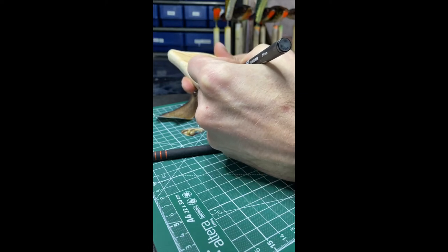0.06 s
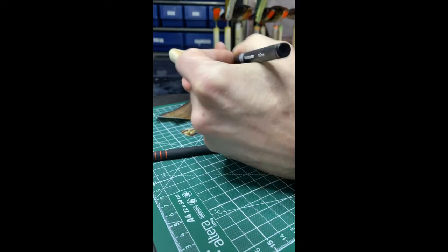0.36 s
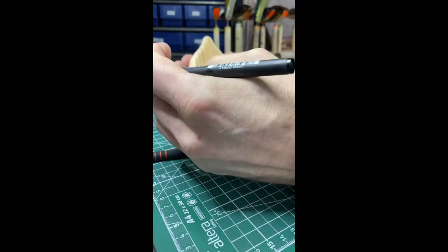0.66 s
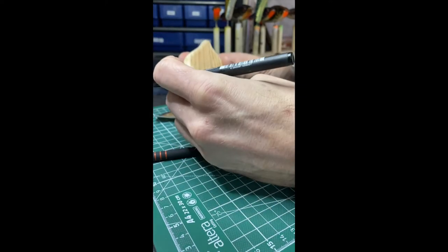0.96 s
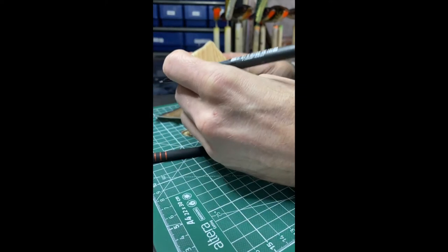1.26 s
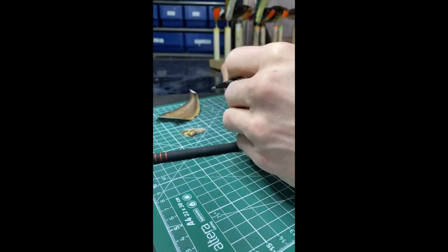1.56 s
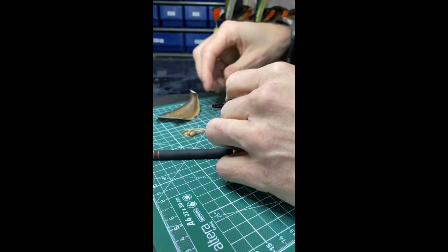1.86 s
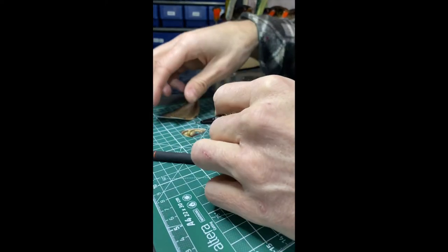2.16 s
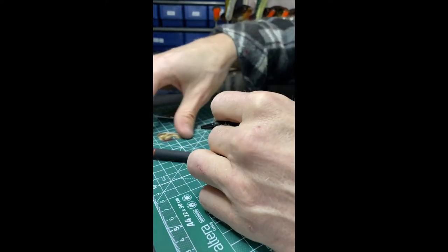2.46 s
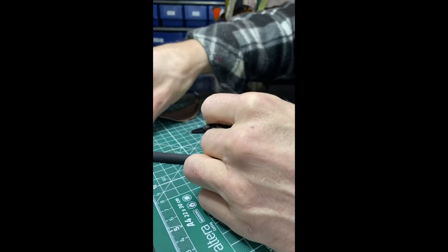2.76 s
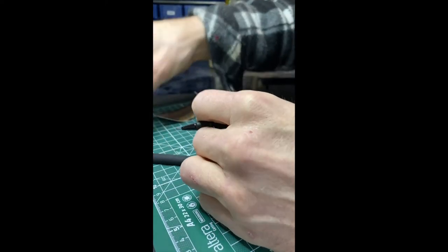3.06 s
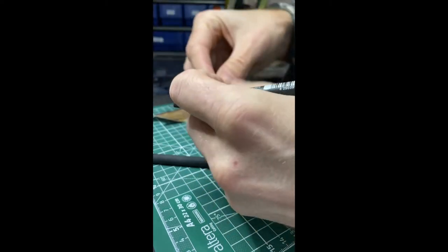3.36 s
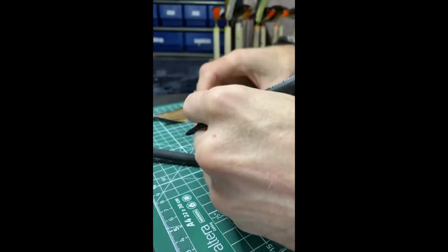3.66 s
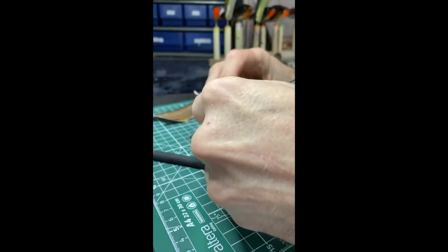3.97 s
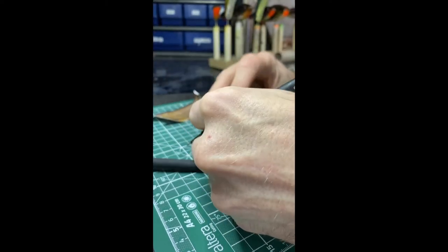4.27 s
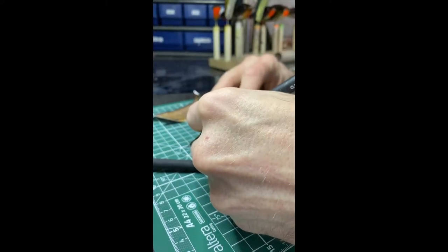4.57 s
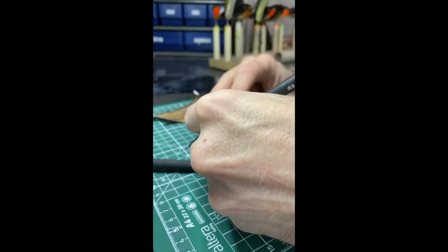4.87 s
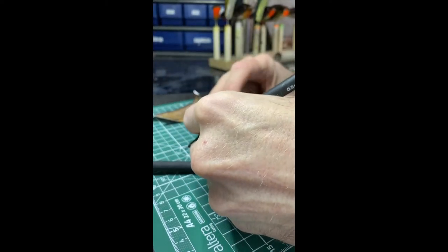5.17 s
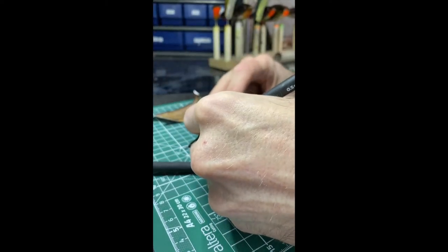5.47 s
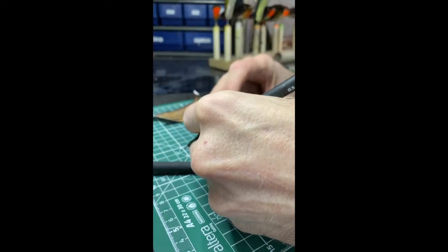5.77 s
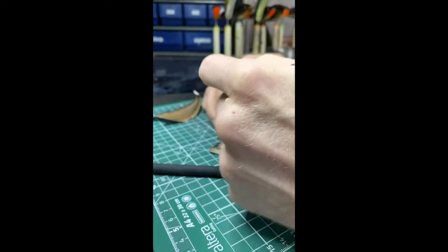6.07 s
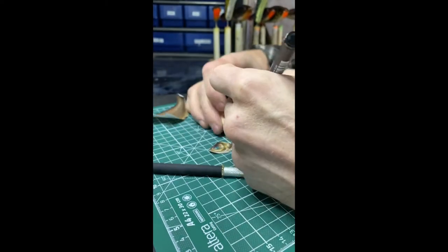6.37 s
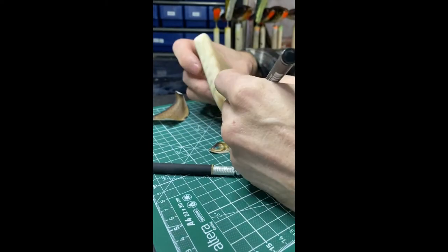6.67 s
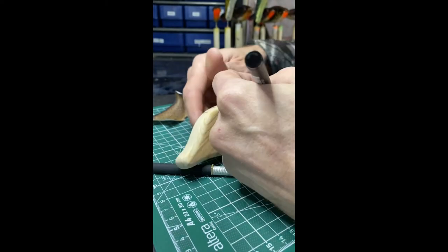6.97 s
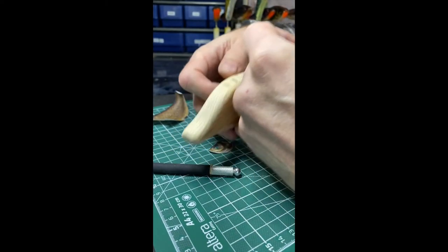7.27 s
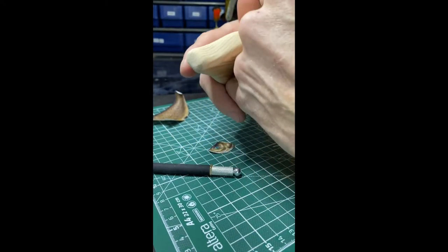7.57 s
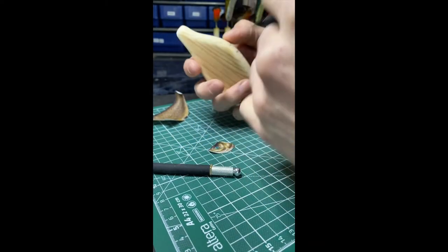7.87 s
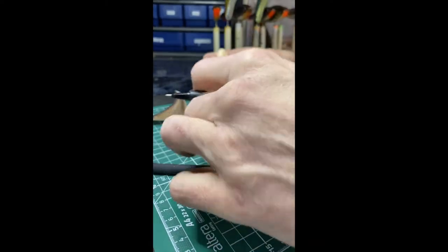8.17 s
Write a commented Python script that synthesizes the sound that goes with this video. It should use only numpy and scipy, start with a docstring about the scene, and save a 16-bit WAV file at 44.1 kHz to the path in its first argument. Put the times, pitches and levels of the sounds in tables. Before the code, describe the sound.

Close, scattered clicks, dull bench bumps and faint skin and sleeve rustles as a pen and wood are handled, a fan humming low.

```python
"""In a small workshop, a pen and a wooden blank are handled on a cutting mat, close to the microphone.
Each tap is an impact: a short pulse of force cracks, rings the modes of the wood and sends bending
waves through the bench, which booms; the room's reverberation soon dies. Between the taps, friction
of hands and a sleeve makes hisses, scuffs and tiny rasps over the low hum of a fan."""
import sys
import numpy as np
from scipy import signal
from scipy.fft import rfft, irfft
from scipy.io import wavfile
from scipy.ndimage import map_coordinates

SR = 44100
rng = np.random.default_rng(int(sys.argv[2]) if len(sys.argv) > 2 else 0)


def master(y):
    """Save y as 16-bit WAV."""
    cut = np.clip(np.atleast_2d(y).T, -1, 1)
    pcm = np.round(cut * 32767)  # scale
    wavfile.write(sys.argv[1], SR, pcm.astype(np.int16))


N = 371181
TIME = np.arange(N) / SR
HZ = np.fft.rfftfreq(N, 1 / SR)


def amp(db):
    """Amplitude ratio: a factor of ten for every 20 dB."""
    return 10 ** (np.asarray(db) / 20)


def unit_rms(x):
    """Normalisation to a mean power of 1."""
    return x / np.sqrt(np.mean(x ** 2) + 1e-20)


def curve(points, hz):
    """Interpolation of a table on a logarithmic frequency axis."""
    f, value = np.transpose(points)
    return np.interp(np.log(hz + 1), np.log(np.maximum(f, 0) + 1), value)


def add(mix, start, sound):
    """Superposition: a sound joins the mix at its start time."""
    part = mix[:, max(round(start * SR), 0):][:, :sound.shape[-1]]
    part += sound[..., :part.shape[1]]


def wander(rate_hz):
    """Random modulation of rms 1, linear between values drawn at the given rate."""
    knots = rng.standard_normal(N // 16)
    return unit_rms(np.interp(TIME * rate_hz, np.arange(len(knots)), knots))


def diffuse(size):
    """Diffuse field: spectra of white noise from all round, partly coherent at two microphone ports."""
    # likeness of the sound at the two ports: f/Hz, correlation coefficient
    coherence = [(60, 0.98), (280, 1), (420, 0.21), (520, 0.65), (700, 0.28), (900, 0.63), (1130, -0.41),
                 (1400, -0.037), (2000, 1), (3000, 0.26), (4500, -0.4), (5500, 0.94), (7500, 1),
                 (16000, 0.39)]
    left, independent = rfft(rng.standard_normal((2, size)))
    common = np.clip(curve(coherence, np.fft.rfftfreq(size, 1 / SR)), -1, 1)
    return np.array([left, common * left + np.sqrt(1 - common ** 2) * independent])


def noise(colour, ripple_db=1.8, ripple_hz=70, size=2 ** 19):
    """Spectral shaping: coloured diffuse noise with a slight, steady random ripple above 900 Hz."""
    hz = np.fft.rfftfreq(size, 1 / SR)
    knots = rng.standard_normal(size // 64)
    uneven_db = ripple_db * np.interp(hz / ripple_hz, np.arange(len(knots)), knots) * (hz > 900)
    x = irfft(diffuse(size) * amp(curve(colour, hz) + uneven_db))[:, :N]
    return x / x.mean(0).std()


def fan(low_db=-49.5, high_db=-66.5, tone_db=-3, waver=.006):
    """Flow noise: a steady broadband rush of air with a few faint tones that waver in frequency."""
    # spectra of the low rush and the upper hiss: f/Hz, level/dB
    rush_colour = [(12, -47), (20, -37), (54, -1.5), (107, -4.5), (150, -13.5), (183, -8.5), (235, -2.5),
                   (318, -5.5), (346, -8), (370, -6.5), (430, -5), (476, -15.5), (676, -9), (827, -6.5),
                   (1100, -27.5), (1430, -54), (2420, -120)]
    hiss_colour = [(650, -32.5), (1100, -3.5), (1630, -14), (1990, -12), (2670, -23), (2950, -20.5),
                   (4880, -29.5), (7060, -39), (16000, -51.5)]
    # tones of the hum: f/Hz, relative level/dB
    tones = [(236.9, -59.5), (376.8, -61.5), (597.5, -67.5), (678.3, -62.5)]
    air = amp(low_db) * noise(rush_colour) + amp(high_db) * noise(hiss_colour)
    hum = 0
    for hz, db in tones:
        pitch = hz * (1 + waver * wander(20))
        hum += amp(db) * np.sin(2 * np.pi * np.cumsum(pitch) / SR)
    return air + np.sqrt(2) * amp(tone_db) * hum


def room(x, delay_s=0.0035, early_db=6, early_s=0.034, size=256):
    """Reverberation: strong early reflections off bench and shelves, then exponential decay by band."""
    # reverberation time: f/Hz, T60/s
    decay_times = [(60, 0.45), (250, 0.45), (1000, 0.21), (2500, 0.29), (6000, 0.19), (15000, 0.22)]
    # spectrum of the reflections: f/Hz, level/dB
    colour = [(60, 3.5), (170, 5), (300, -5), (550, 5.5), (900, -0.5), (1300, 3), (2000, -9.5), (3200, -6),
              (4500, -9), (6200, -11), (16000, -12.5)]
    hz, t, bands = signal.stft(irfft(diffuse(SR // 2)), SR, nperseg=size)
    bands *= amp(-60 * t / curve(decay_times, hz)[:, None] + curve(colour, hz)[:, None])
    tail = signal.istft(bands, SR, nperseg=size)[1]
    tail[:, :int(delay_s * SR)] = 0
    tail *= amp(early_db * np.exp(-(TIME[:tail.shape[1]] / early_s) ** 2))
    return signal.fftconvolve(x, tail / np.linalg.norm(tail[0]), axes=1)[:, :N]


def sweep(length, attack_s=0.026, sag_db_per_s=2, release_db_per_s=203.5):
    """Amplitude envelope of a brushing hand: it gets going, eases off a little and comes to rest."""
    t = np.arange(0, length + .3, 1 / SR)
    rise = np.sin(np.pi / 2 * np.clip(t / attack_s, 0, 1)) ** 2
    return rise * amp(-sag_db_per_s * t - release_db_per_s * np.maximum(t - length, 0))


def drifting_colour(x, patch_db=2.5, patch_hz=600, patch_s=.06, size=512):
    """Time-varying filter: small random peaks and dips drift through the hiss, so it shimmers."""
    hz, t, bands = signal.stft(x, SR, nperseg=size)
    knots = rng.standard_normal((128, 1024))
    grid = np.meshgrid(hz / patch_hz, t / patch_s, indexing="ij")
    patches = unit_rms(map_coordinates(knots, grid, order=1, mode="wrap"))
    return signal.istft(bands * amp(patch_db * patches), SR, nperseg=size)[1][:, :N]


def brushing(gain_db=6, grain_db=1.05, grain_hz=400, pressure_db=2.9, pressure_hz=22):
    """Sliding friction: skin and sleeve hiss, modulated by wavering pressure and tiny catching grains."""
    # hand movements: start t/s, duration/s, relative level/dB
    movements = [(0.33, 0.83, -81.5), (0.42, 0.038, -70), (0.517, 0.022, -67.5), (0.682, 0.15, -72.5),
                 (1.22, 0.88, -77), (1.292, 0.063, -73.5), (1.592, 0.19, -71.5), (1.896, 0.028, -73),
                 (2.109, 0.16, -84), (2.334, 0.34, -62.5), (2.66, 0.078, -74), (2.78, 0.033, -67),
                 (2.86, 0.14, -79), (2.928, 0.1, -69), (3.075, 0.34, -76), (3.376, 0.055, -66.5),
                 (3.492, 0.063, -69.5), (3.569, 0.25, -76), (3.86, 0.033, -83), (3.932, 0.046, -79),
                 (5.825, 0.031, -58.5), (5.85, 2.2, -74.5), (5.88, 0.26, -70), (6.176, 0.21, -67),
                 (6.356, 0.35, -69.5), (6.806, 0.14, -66), (7.036, 0.15, -67), (7.21, 0.067, -61),
                 (7.382, 0.15, -63), (7.536, 0.17, -67), (7.775, 0.3, -71.5), (8.016, 0.11, -62.5),
                 (8.132, .12, -68.5), (8.294, 0.13, -69)]
    # spectrum of the hiss: f/Hz, level/dB
    colour = [(1200, -30.5), (2500, -0.5), (4000, 1.5), (5600, 4.5), (7200, -4.5), (8500, 4.5), (10500, 0),
              (12300, -0.5), (13700, -10), (15200, 0), (16000, 2)]
    power = np.zeros((1, N))
    for start, length, db in movements:
        add(power, start, (amp(db) * sweep(length)) ** 2)  # incoherent sounds add in power
    hiss = drifting_colour(noise(colour, ripple_db=2.5))
    flicker_db = grain_db * wander(grain_hz) + pressure_db * wander(pressure_hz)
    return hiss * np.sqrt(power) * amp(gain_db + flicker_db)


def stroke(middle, length):
    """Bell-shaped velocity profile of a hand that starts, glides and stops."""
    speed, moving = np.zeros(N), abs(TIME - middle) < length
    speed[moving] = np.exp(-abs(2.19 * (TIME[moving] - middle) / length) ** 3)
    return speed


def scuffing(gain_db=-1, grain_db=2, grain_hz=300, grit_grain_db=1, grit_hz=700):
    """Friction noise grows with speed: hand and blank rub the mat, and shifting weight rumbles."""
    # scuffs: middle t/s, duration/s, relative level/dB, grit level re the rub/dB
    scuffs = [(1.858, 0.075, -48, -17), (1.943, 0.087, -54.5, -21), (2.035, 0.126, -57, -19),
              (2.092, 0.042, -54, -31), (2.54, 0.55, -62, -3), (2.614, 0.038, -59.5, 4),
              (2.792, 0.051, -69, -2), (2.82, 0.076, -63.5, 1.5), (3.01, 0.69, -70, -7),
              (3.893, 0.1, -53, -11), (4.292, 0.051, -65.5, -0.5), (5.835, 0.054, -64.5, 1),
              (5.864, 0.027, -56, 6), (5.947, 0.23, -54, -10), (6.085, 0.084, -50.5, -5),
              (6.212, 0.12, -56.5, -11), (6.296, 0.037, -51, -1.5), (6.451, 0.089, -49, -7),
              (7.8, 1.2, -76, -6), (8.18, 0.15, -60, -21), (8.41, 0.13, -64, -5.5)]
    # shifts of the heel of the hand: middle t/s, duration/s, relative level/dB
    shifts = [(2.803, 0.095, -44), (5.87, 0.086, -46.5), (5.95, 0.13, -53), (6.118, 0.16, -49)]
    # spectra of the dull rub, its grit and the rumble: f/Hz, level/dB
    rub_colour = [(300, -13), (900, -1), (1500, 2), (2500, -1.5), (3300, -10), (4500, -15), (5800, -20.5),
                  (7500, -44), (16000, -46)]
    grit_colour = [(1500, -9), (3000, 5), (4100, 0.5), (4700, -11), (5900, 6), (7500, -10.5),
                   (16000, -10.5)]
    rumble_colour = [(30, -20), (70, 4), (150, 11), (290, -4.5), (450, -1), (700, -8), (1200, -43),
                     (3000, -44), (16000, -70)]
    rub = noise(rub_colour)
    grit = noise(grit_colour) * unit_rms(amp(grit_grain_db * wander(grit_hz)))
    scrape = sum(amp(db) * stroke(middle, length) * (rub + amp(grit_db) * grit)
                 for middle, length, db, grit_db in scuffs)
    rumble = noise(rumble_colour) * sum(amp(db) * stroke(middle, length) for middle, length, db in shifts)
    return (scrape + rumble) * amp(gain_db + grain_db * wander(grain_hz))


def catches(t60=0.019, q=2.1, size=2048):
    """Static friction: skin or cloth holds for an instant and lets go with a tiny bright rasp."""
    # releases: t/s, peak level/dB, centre f/Hz
    releases = [(.532, -56, 5500), (.549, -55, 6000), (0.5773, -47, 5530), (2.5448, -45, 4500),
                (2.607, -41, 4200), (2.66, -43, 4800), (2.801, -43, 4300), (2.8167, -39, 4700),
                (3.395, -41.5, 10500), (5.8617, -45, 4100), (6.2878, -53, 3200)]
    out, t = np.zeros((2, N)), np.arange(size) / SR
    for start, db, hz in releases:
        burst = irfft(diffuse(size)) * amp(-60 * t / t60)
        rasp = signal.lfilter(*signal.iirpeak(hz, q, SR), burst)
        rasp = signal.lfilter(*signal.butter(2, min(1.4 * hz, .45 * SR), fs=SR), rasp)
        add(out, start, amp(db) * rasp / abs(rasp).max())
    return out


def drags(gain_db=1.5, waver=0.0037, waver_hz=25, flicker_db=2):
    """Rapid stick-slip: fingertips on wood hiss in a narrow band that wavers with the pressure."""
    # fingertip slides: middle t/s, duration/s, centre f/Hz, bandwidth/Hz, relative level/dB
    slides = [(0.35, 0.029, 5100, 700, -73), (0.755, 0.27, 5300, 1200, -75),
              (1.504, 0.77, 4870, 1200, -77.5), (2.083, 0.018, 2250, 500, -53),
              (2.521, 0.31, 5760, 500, -67), (3.887, 0.05, 2530, 400, -51), (5.866, 0.033, 3980, 400, -52),
              (6.447, 0.078, 5600, 300, -58.5), (6.561, 0.11, 5540, 220, -57),
              (6.692, 0.17, 4700, 220, -66.5), (6.89, 0.097, 5600, 400, -66), (7.116, 0.27, 5580, 177, -65),
              (7.253, 0.12, 5400, 500, -55.5), (7.27, 0.082, 4940, 600, -62),
              (7.456, 0.18, 4680, 330, -65.5), (7.63, 0.2, 4690, 350, -67.5), (7.66, 0.075, 5300, 500, -65),
              (7.83, 0.096, 4620, 300, -72), (8.053, 0.096, 5630, 497, -65), (8.277, 0.2, 5500, 294, -69)]
    out, grains = np.zeros((2, N)), irfft(diffuse(N), N)
    bend = 1 + waver * wander(waver_hz)
    for middle, length, hz, width_hz, db in slides:
        speed = stroke(middle, length)
        moving = speed > .001
        carrier = np.exp(2j * np.pi * np.cumsum(hz * bend[moving]) / SR)
        # shift down, low-pass, shift back: a pass band that follows the carrier
        band = carrier * signal.lfilter(*signal.butter(2, width_hz / 2, fs=SR), grains[:, moving] / carrier)
        out[:, moving] += amp(db + gain_db) * speed[moving] * unit_rms(band.real)
    return out * amp(flicker_db * wander(90))


def ring(modes, t, detune, uneven_db=2):
    """Free vibration of damped modes; grip and point of contact vary their pitch and share per blow."""
    hz, db, t60 = np.transpose(modes)[:, :, None]
    pitch, share = rng.uniform(-1, 1, (2, len(modes), 1))
    envelopes = amp(db + uneven_db * share - 60 * t / t60)
    return (envelopes * np.sin(2 * np.pi * hz * (1 + detune * pitch) * t)).sum(0)


def bending(hz, lag_s=0.0101, knee_hz=420):
    """Dispersion: long bending waves cross the bench slowly, so a blow arrives as a falling chirp."""
    return np.exp(-2j * np.pi * lag_s * knee_hz * np.arctan(hz / knee_hz))


def kick(kick_hz=190, size=4096):
    """Direct wave of a push: a short, dry knock that runs through the bench top."""
    hz = np.fft.rfftfreq(size, 1 / SR)
    wave = irfft(bending(hz) * (hz / kick_hz) ** 2 / (1 + (hz / kick_hz) ** 4))
    return wave / abs(wave).max()


def thump(boom_hz, rise_s=0.0028, q=1.0, low_cut_hz=52, size=16384):
    """Bench resonance: the mat passes on a push slowly; its place and softness favour modes near one pitch."""
    # modes of the bench top: f/Hz, level/dB, T60/s
    bench_modes = [(60, -7, 0.2), (70.6, 2, 0.17), (97, 4.5, 0.12), (113.9, -4, 0.04), (154.6, 0, 0.12),
                   (177, 1, 0.09), (228.6, -6.5, 0.07), (273.5, -4.5, 0.11), (325, 0.5, 0.038),
                   (373, -5.5, 0.075), (496, 0, 0.031), (585, -6.5, 0.05)]
    t = np.arange(size) / SR
    boom = ring(bench_modes, t, detune=.03) * (1 - np.exp(-(t / rise_s) ** 2))
    boom = signal.lfilter(*signal.iirpeak(boom_hz, q, SR), boom)
    boom = signal.lfilter(*signal.butter(2, low_cut_hz, "high", fs=SR), boom)
    return boom / abs(boom).max()


def minimum_phase(gain):
    """Minimum phase: the spectrum of the most compact causal pulse with this magnitude."""
    log_gain = np.log(np.r_[gain, gain[-2:0:-1]])
    return np.exp(np.conj(signal.hilbert(log_gain)))[:len(gain)]


def crack(hard_hz, order, knock_hz, knock_db, lead_s, nearby_db=0, free_db=0,
          knock_width_hz=620, ring_db=-49, scatter_db=1, scatter_t60=0.014, size=4096):
    """Impact: a force pulse, wider when soft, rings the wood and reflects off hands and mat."""
    # spectra of a hard blow and of its nearby reflections: f/Hz, level/dB
    blow_colour = [(40, -15), (200, 1), (400, -5.5), (650, -5.5), (1000, -8.5), (1600, 0.5), (2400, 4),
                   (3000, 2), (3900, 5), (4900, 1), (6100, 3), (7500, -18.5), (9500, -24), (16000, -6)]
    scatter_colour = [(100, 4), (500, 9), (2500, -4.5), (5000, -6), (9000, 16.5), (16000, -4)]
    # modes of the blank: f/Hz, level/dB, T60/s
    wood_modes = [(463, -6.5, .1), (828, 4, 0.089), (1061, -2, 0.11), (1350, -5, .07), (1649, 4, 0.052),
                  (2230, -5, .08), (2575, -14.5, .07), (2745, -15.5, .07), (3300, -12, .08),
                  (4630, -11, .07), (5620, 0.5, .06)]
    t, hz = np.arange(size) / SR, np.fft.rfftfreq(size, 1 / SR)
    force = bending(hz) * np.exp(-2j * np.pi * hz * lead_s) / np.sqrt(1 + (hz / hard_hz) ** (2 * order))
    # the hand damps the main bending mode into one broad hump
    hump_db = knock_db / (1 + ((hz - knock_hz) / knock_width_hz) ** 2)
    pulse = force * minimum_phase(amp(curve(blow_colour, hz) + hump_db))
    paths = irfft(diffuse(size)) * amp(-60 * t / scatter_t60) * (t > .0003)
    paths *= rng.random(size) < .2  # sparse, separate reflections
    scatter = rfft(paths / np.linalg.norm(paths[0]))
    scatter *= amp(scatter_db + nearby_db + curve(scatter_colour, hz))
    wood = amp(ring_db + free_db) * rfft(ring(wood_modes, t, detune=.004))
    return irfft(pulse * (1 + scatter + wood)) / abs(irfft(pulse)).max()


def taps(crack_db=-1, boom_db=-2, kick_db=-7, bump_db=4, balance_db=-1, lead_s=.001, boom_lag_s=0.0038):
    """Impulsive excitation by pen, wood and hand: returns cracks, their feed to the room, and the boom."""
    # pen and wood touching down, all levels relative: t/s, level/dB, treble corner f/Hz, roll-off order,
    # knock f/Hz, knock/dB, push on the bench/dB, boom f/Hz, reflections/dB, free ring/dB, room feed/dB
    impacts = [(1.7603, -1, 7600, 4, 850, 3.5, -27.5, 68, -0.5, -14.5, 0.5),
               (1.7622, -14.5, 7000, 4, 3400, 8, -38, 110, -2.5, -10, 12),
               (1.868, -37.5, 2100, 4, 1900, 0, -38, 180, 5.5, 1, 0),
               (3.681, -26.5, 4400, 9, 1820, 9.5, -29, 75, 5, -5, 3),
               (3.7092, -30, 3900, 5, 2020, 8, -35, 85, 2.5, 2, 0),
               (3.7334, -21.5, 2500, 1.6, 2400, 11.5, -28.5, 90, 4.5, 5, 0.5),
               (3.7845, -31.5, 4200, 2.5, 1910, 5, -34.5, 110, 5, -2, 3),
               (4.081, -23.5, 3830, 4, 1700, 1, -36.5, 119.5, -2, 1, 2.5),
               (4.1347, -8, 4100, 1.9, 2400, 8, -28.5, 124, -2, 1.5, -1),
               (5.91, -27, 2650, 4, 1500, 0.5, -29.5, 201, 2.5, 0, 3),
               (6.4299, -27, 3630, 4, 2000, 12, -39, 100, -2, 3, 4),
               (6.4582, -27.5, 2880, 4, 2130, 22, -20.5, 83.5, 2, -9, 1),
               (6.4631, -21, 2900, 4, 1550, 11, -22, 101, 2, -12, -2.5),
               (6.4737, -12.5, 3030, 1.4, 2380, 7.5, -24.5, 160, -1, -11, -2),
               (6.491, -21, 3100, 3, 1780, 15, -34.5, 150, 3, -6, -2),
               (6.722, -27.5, 2100, 6, 1410, -1, -15.5, 92, 2.5, -4, 0.5),
               (6.728, -35, 2600, 5, 1910, 8, -22.5, 99, 0, -3.5, -4),
               (6.904, -21.5, 1800, 4, 1760, 13.5, -16, 78, -1.5, -13, -5.5),
               (6.9088, -31, 2200, 6, 2100, 4, -28, 90, 5, -6, 6),
               (6.939, -1, 7400, 2.5, 1730, 9, -24.5, 192, 0, -6.5, -5),
               (6.9532, -16.5, 2200, 4, 1750, 13, -25.5, 110, 0, -3.5, -6),
               (7.1281, -33.5, 2830, 4, 1670, 4, -26, 90, -2, 2, 4),
               (8.1436, -26.5, 1700, 4, 1547, -2.5, -25.5, 93.5, 2, -2, 0.5)]
    # fingers shifting on the pen: t/s, relative level/dB
    ticks = [(2.9523, -50), (3.087, -47.5), (3.1366, -47.5), (3.241, -49), (3.289, -54.5), (3.395, -45),
             (4.2033, -37.5), (7.564, -49)]
    # soft bumps of a hand on the bench: t/s, relative level/dB
    bumps = [(1.878, -37), (2.346, -38), (2.788, -40.5), (2.859, -44.5), (4.207, -46.5), (5.863, -45),
             (6.047, -41.5), (6.238, -45.5), (6.303, -40), (6.418, -40), (6.832, -40.5), (7.97, -38.5),
             (8.069, -34.5), (8.4, -57)]
    cracks, to_room, boom = np.zeros((3, 2, N))
    ports = amp(balance_db * np.array([[.5], [-.5]]))
    for t, db, hard_hz, order, knock_hz, knock_db, push_db, boom_hz, nearby_db, free_db, room_db in impacts:
        hit = ports * amp(db + crack_db) * crack(hard_hz, order, knock_hz, knock_db, lead_s, nearby_db, free_db)
        add(cracks, t - lead_s, hit)
        add(to_room, t - lead_s, amp(room_db) * hit)
        add(boom, t, amp(push_db + kick_db) * kick())
        add(boom, t + boom_lag_s, amp(push_db + boom_db) * thump(boom_hz))
    for t, db in ticks:
        hit = amp(db) * crack(hard_hz=4200, order=4, knock_hz=2300, knock_db=6, lead_s=lead_s)
        add(cracks, t, hit)
        add(to_room, t, hit)
    for t, db in bumps:
        add(boom, t, amp(db + bump_db) * thump(boom_hz=48))
    return cracks, to_room, boom


def scene(crack_room_db=-11, boom_room_db=-17):
    """Superposition of the taps, their reverberation, the friction of the hands and the fan."""
    cracks, to_room, boom = taps()
    echo = room(amp(crack_room_db) * to_room + amp(boom_room_db) * boom)
    return cracks + boom + echo + brushing() + scuffing() + catches() + drags() + fan()


def record(dry, edge_hz=15900):
    """Two-port pickup: level and phase between the ports vary with frequency; a low-pass limits the band."""
    # left port over right, mostly in the low middle: f/Hz, level/dB
    balance = [(60, 0.85), (200, 3), (280, 4), (380, 9.5), (470, 6), (600, 5.5), (850, 0), (1100, 6.5),
               (1500, 0), (16000, 0.5)]
    # lag of the right port: f/Hz, phase/rad
    phase_lag = [(190, 0), (300, -0.38), (420, 0.95), (520, 1.28), (640, 0.5), (4500, -2), (5800, 1.75),
                 (7500, 3), (10400, 5.5), (13700, 10), (16000, 8.5)]
    ports = amp(curve(balance, HZ) * np.array([[.5], [-.5]]))
    lag = np.exp(-1j * np.outer(np.arange(2), curve(phase_lag, HZ)))
    heard = irfft(rfft(dry) * lag * ports / ports.mean(0), N)
    low_pass = signal.firwin(511, edge_hz, window=("kaiser", 9), fs=SR)
    return signal.oaconvolve(heard, low_pass[None], "same")


dry = scene()
out = record(dry)
master(out)
```